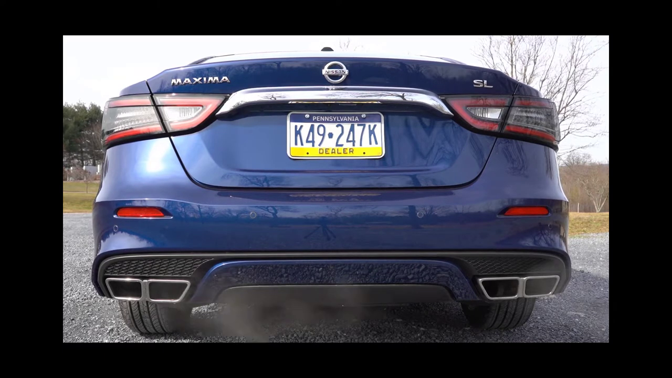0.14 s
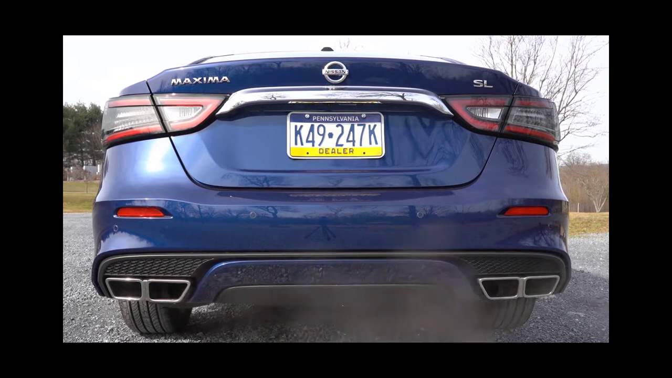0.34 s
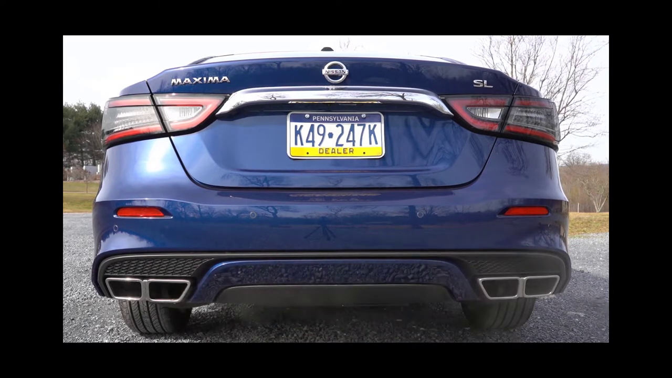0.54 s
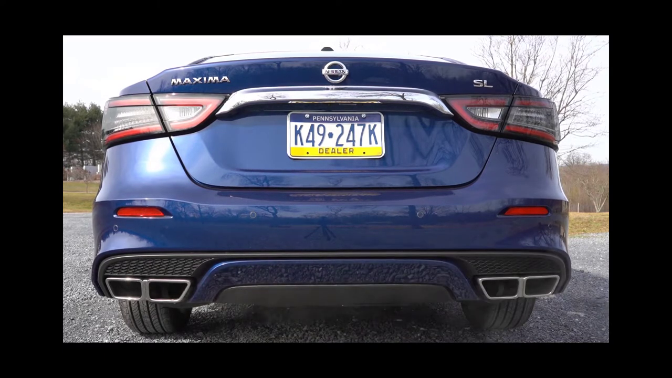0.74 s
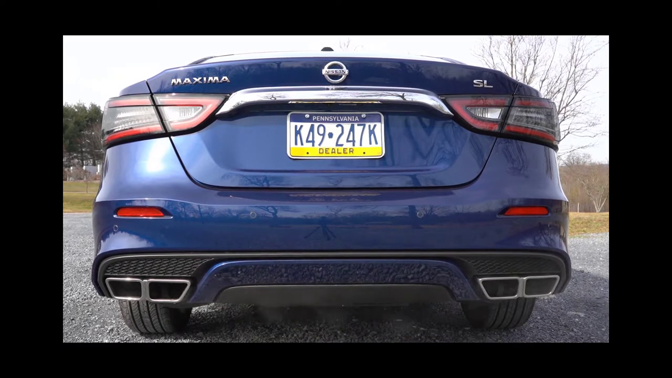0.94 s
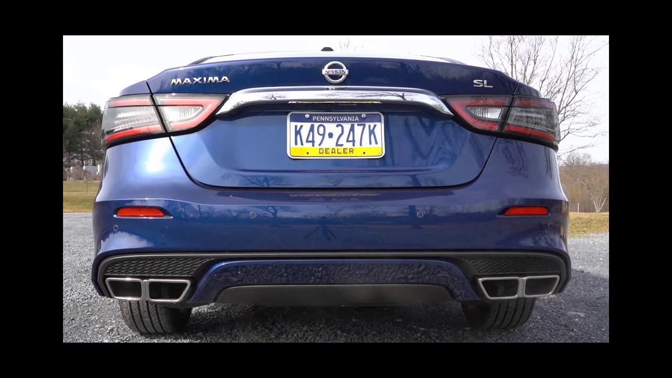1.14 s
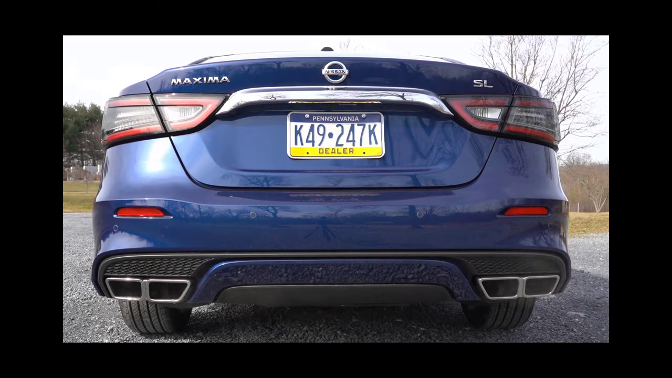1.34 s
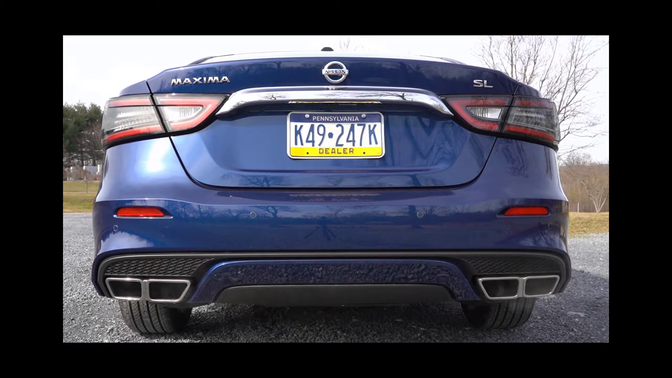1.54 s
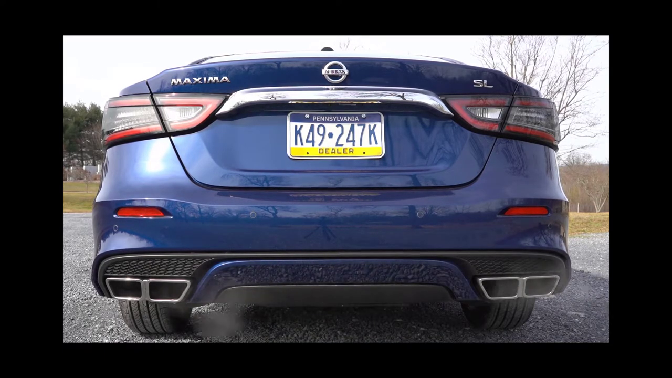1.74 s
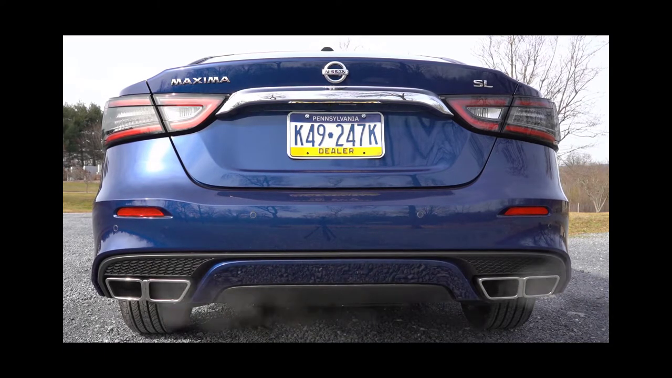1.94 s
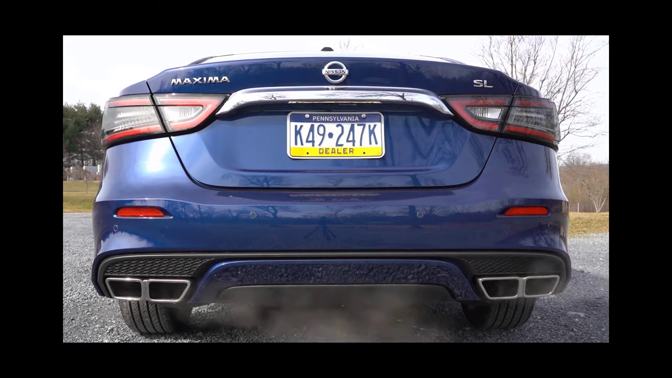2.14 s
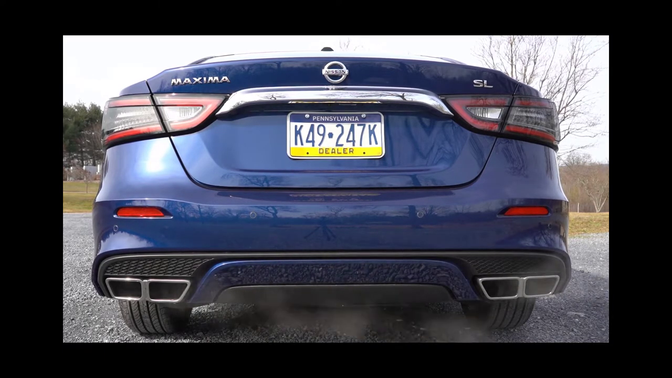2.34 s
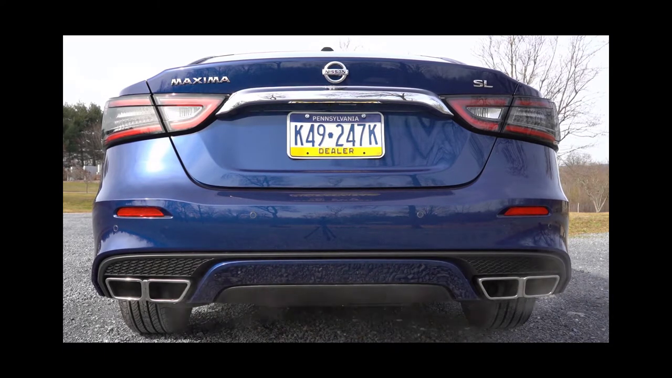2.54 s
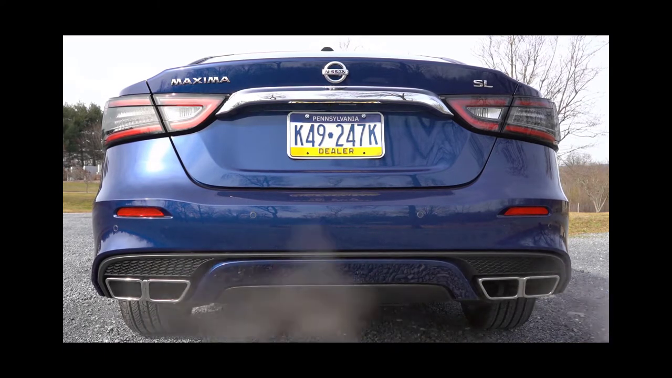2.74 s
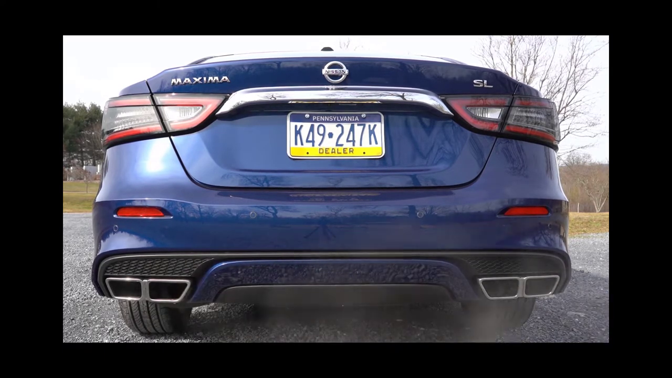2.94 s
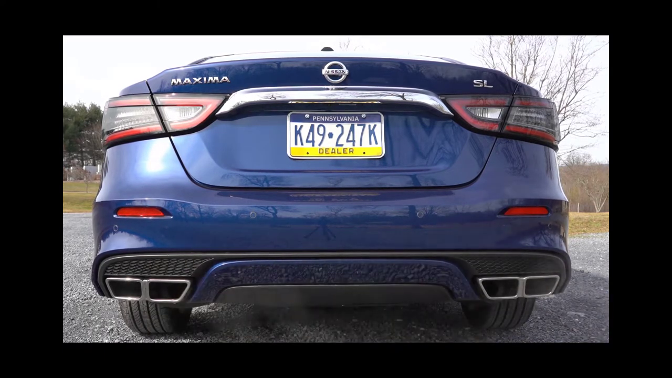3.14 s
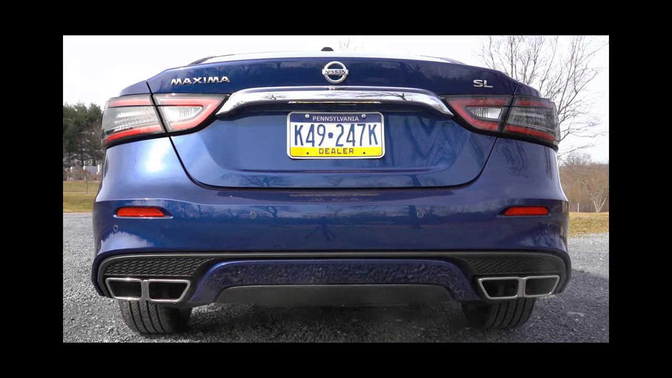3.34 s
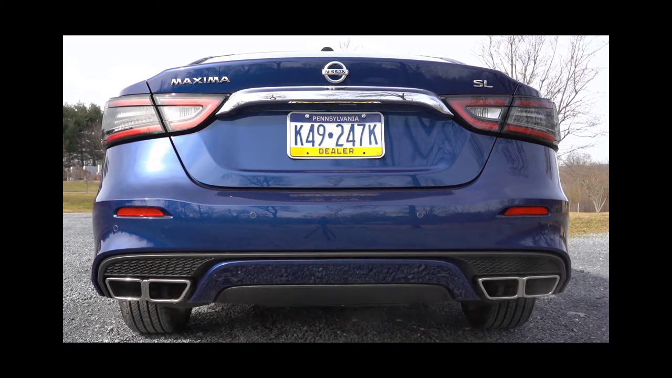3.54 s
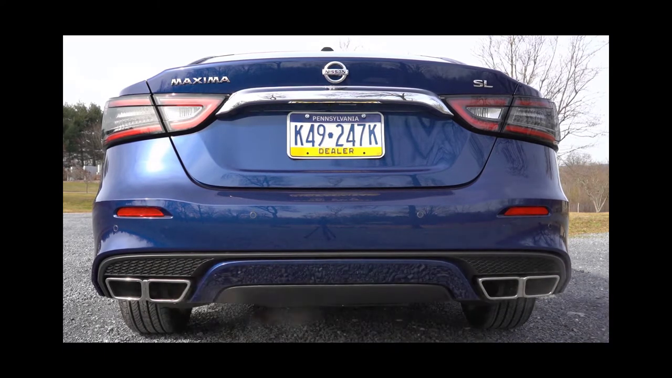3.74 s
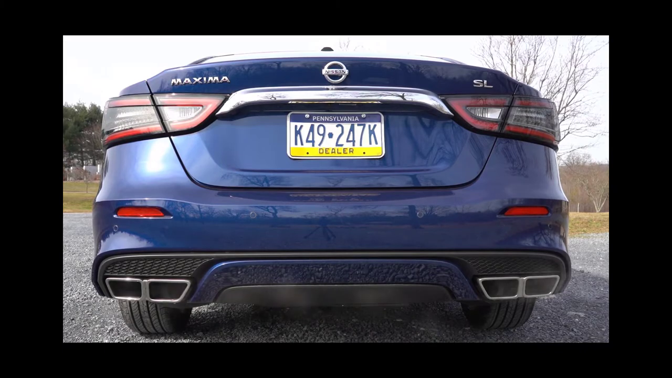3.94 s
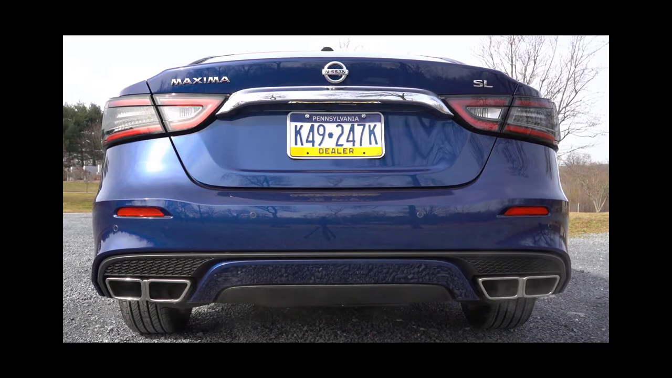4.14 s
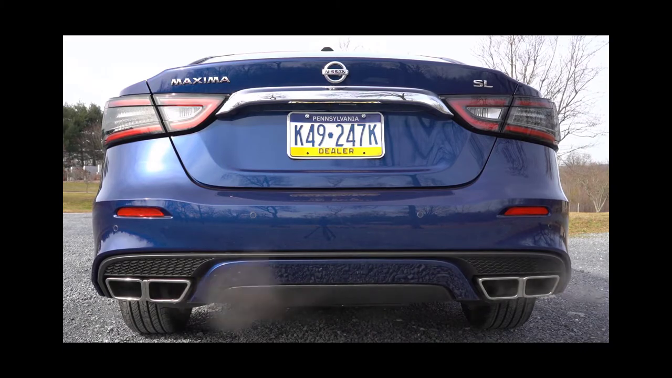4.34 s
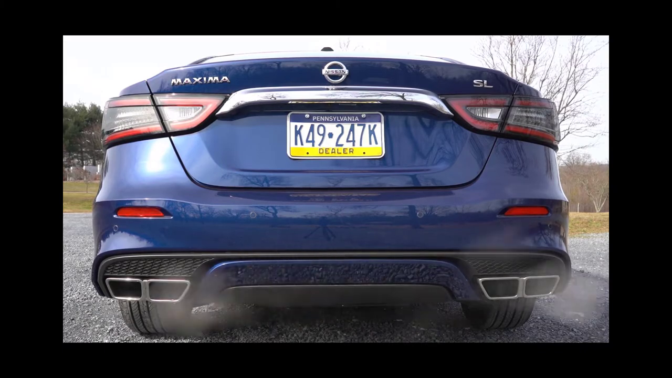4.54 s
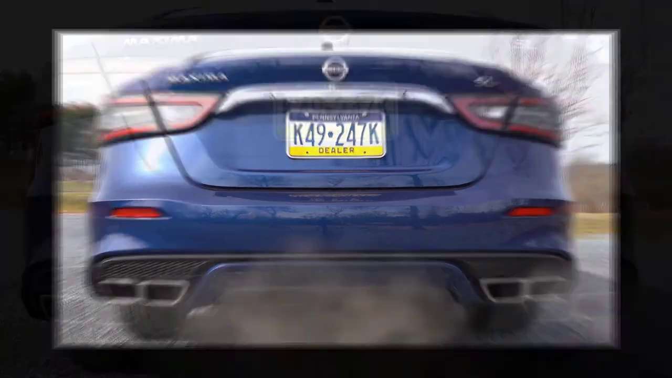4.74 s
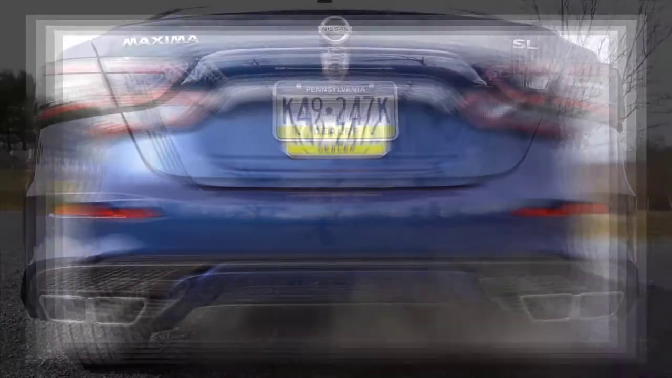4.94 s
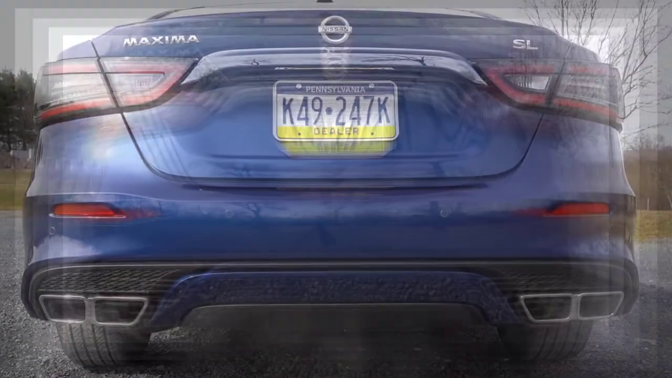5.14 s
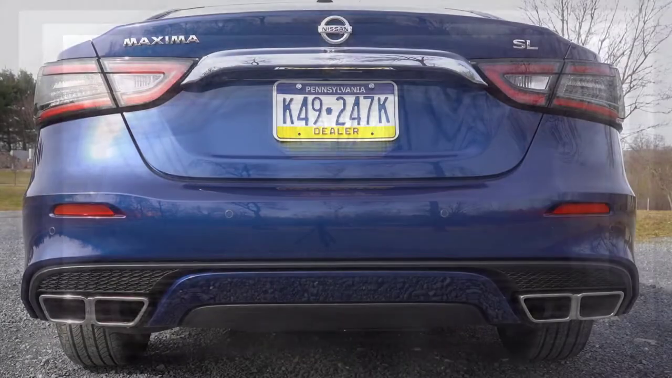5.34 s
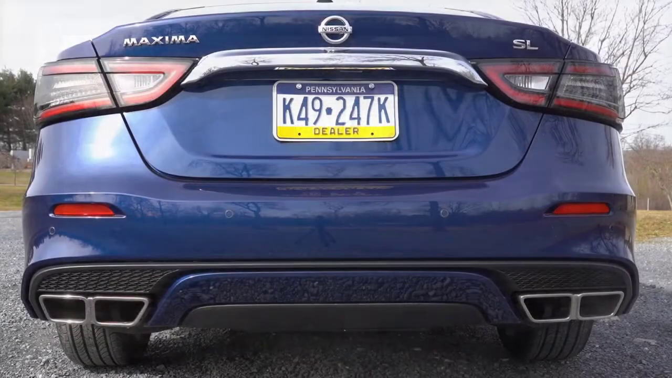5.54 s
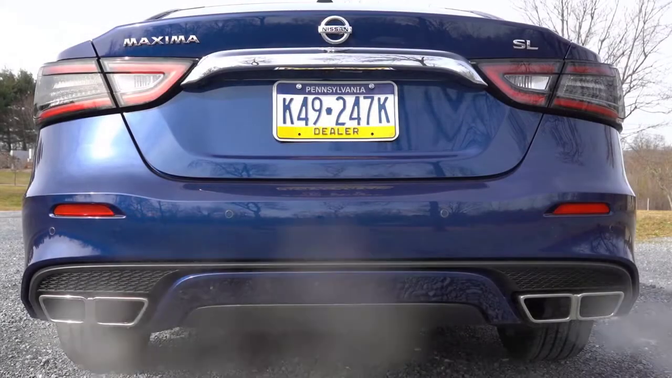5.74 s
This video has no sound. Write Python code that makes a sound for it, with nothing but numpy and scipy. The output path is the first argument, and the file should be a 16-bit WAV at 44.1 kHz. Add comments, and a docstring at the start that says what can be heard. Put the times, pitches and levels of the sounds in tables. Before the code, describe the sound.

A six-cylinder car engine is revved again and again, its exhaust booming, snarling at each peak, then burbling and hissing as the revs sink.

```python
"""A V6 car is revved again and again, heard outdoors from close behind its twin tailpipes.
Six uneven cylinders blow pulses into the exhaust. A double stab of the throttle makes it boom, then
snarl at the top, then burble and hiss as the revs sink. A thin whine comes in near idle, lasts through
a small blip and stops as a big one takes off at 2.6 s. Another blip follows at 4.5 s, then two faint
ticks, the second as the last and highest rev starts to climb."""
import sys
import numpy as np
from scipy import signal
from scipy.fft import rfft, irfft, next_fast_len
from scipy.io import wavfile
from scipy.ndimage import uniform_filter1d

SR = 44100
rng = np.random.default_rng(int(sys.argv[2]) if len(sys.argv) > 2 else 0)


def digitize_waveform(pressure):
    """Quantize a signal to 16-bit integers and store it at the path in sys.argv[1].

    Rows of a 2-D input are taken as channels; values are limited to [-1, 1].
    """
    field = np.atleast_2d(pressure).T
    bounded = np.clip(field, -1, 1)
    quanta = np.round(bounded * 32767).astype(np.int16)
    wavfile.write(sys.argv[1], SR, quanta)


N = 260190
TIME = np.arange(N) / SR

# rough firing, cleanest at the top of each blip: (time [s], raggedness [0-1])
RAGGEDNESS = [(.15, .8), (.45, .22), (.65, .22), (1, .55), (1.6, 1), (2.25, .45), (2.7, .5), (2.9, .15),
              (3.08, .17), (3.3, .8), (3.7, .5), (4.4, 1), (4.85, .25), (5.15, .28), (5.6, .7), (5.85, .22)]
# cylinders in firing order: (pulse strength [dB], lateness [share of the firing interval])
CYLINDERS = [(-4, -.04), (-.4, .01), (.1, -.01), (-3, .29), (2.1, -.06), (1.5, -.18)]
# mix of the exhaust layers, by name: (cruising level [dB], rise with speed [dB/octave],
# lift per unit of throttle [dB], bark [dB], overrun [dB], lull [dB], coast [dB])
LAYER_LEVELS = {"burble": (-27.5, -2.5, 0.5, 3, -3, -3, 1.5), "snarl": (-32, 12.5, 2.7, -1, -4.5, -4, 5),
                "blare": (-35, 17.5, 3.5, 6, 1.7, 0.5, 3.5), "rasp": (-40.5, 11, 4, 9.5, 9, -6, 2),
                "hiss": (-53.2, 9, 3.5, 11, 8.5, -2.5, 0.2), "spray": (-71, 13, -1.5, 3.5, 8, -5.5, -0.5)}
# bright colour of the gas spray and the ticks: (frequency [Hz], relative level [dB])
BRIGHT_SPECTRUM = [(3500, -35.5), (6000, 5.5), (8000, 1), (11000, -9), (15500, -11.5)]


def amp(db):
    """Decibels to gain."""
    return 10 ** (np.asarray(db) / 20)


def unit(x):
    """Scales to rms 1."""
    return x / np.sqrt(np.mean(x ** 2) + 1e-20)


def curves(rows):
    """Joins rows of (time [s], values...) into one automation curve per value."""
    times, *columns = np.transpose(rows)
    return [np.interp(TIME, times, column) for column in columns]


def plateaus(rows, attack_s, release_s):
    """Sums envelopes that rise, hold and fall away."""
    return sum(size * np.clip((TIME - on) / attack_s, 0, 1) * np.clip(1 - (TIME - off) / release_s, 0, 1)
               for on, off, size in rows)


def swells(rows):
    """Sums bell-shaped swells."""
    return sum(size * np.exp(-((TIME - peak) / width) ** 2) for peak, width, size in rows)


def smooth(x, seconds):
    """Triangular running mean."""
    size = max(int(seconds * SR), 1)
    return uniform_filter1d(uniform_filter1d(x, size), size)


def at_level(x, db, seconds):
    """Rides a sound along a level curve while keeping its fast flutter."""
    return amp(db) * x / np.sqrt(abs(smooth(x ** 2, seconds)) + 1e-14)


def wander(rate_hz, size=4096):
    """Random drift of rms 1, rolled off above rate_hz."""
    hz = np.fft.rfftfreq(size, TIME[-1] / size)
    drift = irfft(rfft(rng.standard_normal(size)) / (1 + (hz / rate_hz) ** 4), size)
    return np.interp(TIME, np.linspace(0, TIME[-1], size), unit(drift))


def colour(x, points):
    """Equalises by a curve drawn on a log-frequency axis, then scales to rms 1."""
    size = next_fast_len(N + 4096)
    hz, db = np.transpose(points)
    gain = amp(np.interp(np.log(np.fft.rfftfreq(size, 1 / SR) + 1), np.log(hz), db))
    return unit(irfft(rfft(x, size) * gain, size)[:N])


def ring(x, modes, low_hz, high_hz, sway_db=3.0, sway_hz=7):
    """Rings a set of resonances within one passband; each swells and fades with the unsteady flow."""
    out = np.zeros(N)
    for k, (hz, width, db) in enumerate(modes):
        mode = signal.lfilter(*signal.iirpeak(hz, hz / width, SR), x)
        out += (-1) ** k * amp(db + sway_db * wander(sway_hz)) * mode  # pipe modes alternate in sign
    passband = signal.butter(3, [low_hz, high_hz], "band", fs=SR, output="sos")
    return unit(signal.sosfilt(passband, out))


def engine_state(firing_hz, cruise_hz=130):
    """The controls that ride the mix: octaves above cruising, throttle, bark, overrun, lull, coast."""
    # stabs of the throttle: (opens [s], closes [s], opening [about 1 = full])
    stabs = [(0.03, 0.099, 1), (0.131, .315, 0.99), (1.906, 2.016, 0.9), (2.579, 2.848, 0.96),
             (4.534, 4.76, 1.1), (5.615, 5.732, 0.84)]
    # the exhaust barks as a stab takes hold: (peak [s], half-width [s], strength [factor])
    barks = [(.18, .085, 1.12), (.345, 0.065, 0.64), (2.062, 0.05, 0.58), (2.757, 0.067, 0.8),
             (4.617, 0.047, 0.95), (5.81, 0.093, 1.13)]
    # the engine brakes itself and gas rushes out: (begins [s], eases [s], strength [factor])
    overruns = [(.99, 1.34, 1.045), (3.452, 3.854, 0.84), (5.387, 5.53, 1.05)]
    # the engine floats, neither pulling nor braking: (middle [s], half-width [s], depth [factor])
    lulls = [(.12, 0.012, 0.44), (.65, 0.18, 0.48), (1.79, 0.088, 1.08), (3.01, 0.059, 0.31),
             (4.39, .11, 1.91), (4.95, 0.17, 0.8), (5.595, 0.021, 0.64)]
    octaves = np.log2(firing_hz / cruise_hz)
    throttle = plateaus(stabs, attack_s=0.025, release_s=0.14)
    overrun = plateaus(overruns, attack_s=0.16, release_s=0.28)
    rise_s, fade_s = 0.12, 0.25  # the revs coast for a moment after each stab
    coasts = [plateaus([(closes, closes + rise_s, size)], rise_s, fade_s) for _, closes, size in stabs]
    coast = np.max(coasts, axis=0) * np.clip(1 - throttle, 0, 1)
    return np.array([octaves, throttle, swells(barks), overrun, swells(lulls), coast])


def level(rule, state):
    """A layer's level in dB: its cruising level plus its response to each thing the engine does."""
    return rule[0] + np.array(rule[1:]) @ state


def crank(firing_hz, wobble=0.0067):
    """Engine cycles turned so far; ragged firing shakes the speed."""
    ragged, = curves(RAGGEDNESS)
    shaken_hz = firing_hz * (1 + wobble * ragged * wander(30))
    return np.cumsum(shaken_hz) / SR / len(CYLINDERS)


def pulses(cycles, size=4096, harmonics=170):
    """Six sharp pulses a cycle, of unequal strength and spacing, without the strong low tones."""
    order = np.arange(harmonics)
    lines = sum(amp(db) * np.exp(-2j * np.pi * order * (k + late) / len(CYLINDERS))
                for k, (db, late) in enumerate(CYLINDERS))
    lines[:2] = 0
    lines[[3, 6, 9, 12]] = 0  # boom() plays these
    return unit(np.interp(cycles % 1, np.arange(size) / size, irfft(lines, size)))


def puffs(cycles, steady, decay, uneven_db):
    """Turbulence flares over a steady flow at each firing; decay is in firing intervals."""
    firings = cycles * len(CYLINDERS)
    which = firings.astype(int)
    scatter_db = uneven_db * rng.standard_normal(2048)[which % 2048]
    strength_db = np.array(CYLINDERS)[which % len(CYLINDERS), 0] + scatter_db
    flare = amp(strength_db) * np.exp(-(firings % 1) / decay)
    return unit((steady + flare) * rng.standard_normal(N))


def exhaust_flow(cycles, beat):
    """Adds fresh puffs to the pulse beat: clean firing gives sharp harmonics, ragged firing a fuzz."""
    ragged, = curves(RAGGEDNESS)
    return beat + 2.6 * ragged * puffs(cycles, steady=0.4, decay=0.55, uneven_db=3.5)


def ambience(level_db=-42):
    """The steady wash of engine bay and open air."""
    # a dark bed of noise: (frequency [Hz], relative level [dB])
    wash_spectrum = [(20, -27.5), (50, -9.5), (160, -4), (1000, -5), (4600, -32), (6500, -41.5),
                     (11000, -40), (15500, -54)]
    return amp(level_db) * colour(rng.standard_normal(N), wash_spectrum)


def boom(cycles, firing_hz, state, flutter=0.1):
    """Low harmonics of one cylinder bank's firing rate boom as they sweep the silencer's resonances."""
    # tones at 3, 6, 9 and 12 beats per cycle, ahead of the silencer: columns as in LAYER_LEVELS
    tone_levels = [(-17, 8, -14.5, 0, 2, -11, -5), (-16, 11, 10, -0.24, 3.2, -30, 2.5),
                   (-19, 1, -.5, -1, -9.5, -14.5, -8), (-27.5, -5, 16, -1.2, 1.5, 3, 6)]
    # the silencer's response: (frequency [Hz], gain [dB])
    silencer = [(32, -36), (42, -4.5), (52, -8), (76, -15.5), (95, -8.5), (130, -3.5), (170, -11.5),
                (220, -23), (285, -6), (335, -13.5), (420, -9)]
    hz, gain_db = np.transpose(silencer)
    bank_turns = cycles * len(CYLINDERS) / 2
    out = np.zeros(N)
    for k, rule in enumerate(tone_levels, 1):
        db = level(rule, state) + np.interp(np.log(k * firing_hz / 2), np.log(hz), gain_db)
        tone = np.sqrt(2) * np.cos(2 * np.pi * k * bank_turns)
        out += amp(db) * tone * (1 + flutter * wander(10))
    return out


def burble(flow, state):
    """The muffler rings low, and thumps when the load jumps or the engine catches near idle."""
    # muffler resonances: (frequency [Hz], width [Hz], relative level [dB])
    muffler_modes = [(46.4, 63, -1), (89, 57, 1.5), (126.2, 30.4, 6.5), (206, 16, -7.5),
                     (270.6, 21.2, -1.5), (308, 12, -9)]
    # thumps: (peak [s], half-width [s], lift [dB])
    thumps = [(.07, 0.035, 1), (1.59, 0.045, 4.5), (1.97, 0.041, 8.5), (3.36, 0.12, 7.5),
              (4.17, 0.041, 1.5), (4.57, 0.029, 6), (5.635, 0.032, 10)]
    db = level(LAYER_LEVELS["burble"], state) + swells(thumps)
    return at_level(ring(flow, muffler_modes, 28, 334), db, seconds=0.036)


def drone(flow, trim_db=-0.5):
    """The long pipe hums on two narrow resonances."""
    # long pipe resonances: (frequency [Hz], width [Hz], relative level [dB])
    long_pipe_modes = [(382.4, 7.4, -2), (417.9, 7.2, -13.5)]
    # the drone's fader, ahead of the trim: (time [s], level [dB])
    fader = [(0.0, -55), (0.16, -25.5), (0.26, -36), (0.34, -20), (0.67, -30), (0.71, -27), (0.95, -26),
             (0.98, -38), (1.08, -21.5), (1.76, -41.5), (2.1, -27), (2.76, -30), (2.82, -24), (3.04, -27.5),
             (3.33, -22), (3.42, -31.5), (3.53, -19.5), (4.32, -45), (4.85, -23.5), (5.11, -41.5),
             (5.8, -28.5), (5.9, -41)]
    return at_level(ring(flow, long_pipe_modes, 350, 421), curves(fader)[0] + trim_db, seconds=0.22)


def snarl(flow, state):
    """The mid pipe rings, growing with the revs."""
    # mid pipe resonances: (frequency [Hz], width [Hz], relative level [dB])
    mid_pipe_modes = [(498.7, 47, 1.3), (556.6, 15.6, 8.2), (633.2, 13.3, 9), (708.3, 10, 5)]
    db = level(LAYER_LEVELS["snarl"], state)
    return at_level(ring(flow, mid_pipe_modes, 414, 754), db, seconds=0.086)


def blare(flow, state):
    """The tailpipe rings out at high revs and on each bark."""
    # tailpipe resonances: (frequency [Hz], width [Hz], relative level [dB])
    tailpipe_modes = [(759.8, 15.7, 6.7), (851.6, 19, 3.5), (931.6, 18.6, 6.8), (991, 33, 6.45)]
    db = level(LAYER_LEVELS["blare"], state)
    return at_level(ring(flow, tailpipe_modes, 700, 1164), db, seconds=0.29)


def rasp(flow, cycles, state, steepening=0.27, loud_db=-25):
    """Loud pulses steepen in the pipe and ring the tips; as the revs sink, rushing gas takes over."""
    # metallic resonances of the tips: (frequency [Hz], width [Hz], relative level [dB])
    tip_modes = [(1219.4, 22, 14.5), (1441, 8.3, -9.5), (1425, 7.8, -2.5), (1652, 6, -2)]
    # resonances of the rushing gas: (frequency [Hz], width [Hz], relative level [dB])
    gas_modes = [(1495.6, 80, 4.5), (2135, 97, -6), (2337, 55, -6), (2714, 42, -5.5)]
    blare_db, throttle = level(LAYER_LEVELS["blare"], state), state[1]
    metal_db = blare_db - 14 + steepening * (blare_db - loud_db)
    metal = amp(metal_db) * ring(flow, tip_modes, 1354, 1800)
    turbulence = puffs(cycles, steady=2.9, decay=0.39, uneven_db=2)
    rush_db = level(LAYER_LEVELS["hiss"], state) + 8.5 - 4 * throttle
    rush = amp(rush_db) * ring(turbulence, gas_modes, 880, 3100)
    return at_level(metal + rush, level(LAYER_LEVELS["rasp"], state), seconds=0.059)


def hiss(cycles, state, trim_db=1):
    """The gas jet hisses and rings across the outlets."""
    # colour of the jet: (frequency [Hz], relative level [dB])
    jet_spectrum = [(1500, -28.5), (2900, -7.5), (4400, -9), (4900, -10.5), (5400, -19), (6200, -25.5),
                    (6950, -26.5), (7500, -33), (15500, -43)]
    # outlet resonances: (frequency [Hz], width [Hz], relative level [dB])
    outlet_modes = [(4280, 140, 1), (4320, 77, 4.7), (4730, 21, 0.5)]
    turbulence = puffs(cycles, steady=1.4, decay=1, uneven_db=3)
    jet = colour(turbulence, jet_spectrum)
    outlets = amp(-8) * ring(turbulence, outlet_modes, 3300, 5200, sway_db=-0.5)
    return amp(level(LAYER_LEVELS["hiss"], state) + trim_db) * unit(jet + outlets)


def spray(cycles, state):
    """A hard flow at high revs adds a fine, high spray."""
    turbulence = puffs(cycles, steady=0.8, decay=0.5, uneven_db=2)
    return amp(level(LAYER_LEVELS["spray"], state)) * colour(turbulence, BRIGHT_SPECTRUM)


def whine(pitch_hz=9152, level_db=-79, start_s=1.48, end_s=2.65):
    """A thin, high tone with a slight quiver in its pitch."""
    hz = pitch_hz + 18 * wander(60)
    tone = np.sqrt(2) * np.sin(2 * np.pi * np.cumsum(hz) / SR)
    gate = smooth(1.0 * ((TIME > start_s) & (TIME < end_s)), seconds=0.02)
    return amp(level_db) * gate * tone


def ticks(decay_s=0.0012):
    """Tiny bursts of bright noise, heard as sharp clicks."""
    # clicks: (time [s], level [dB])
    clicks = [(5.1824, -50), (5.6452, -47)]
    envelope = sum(amp(db) * (TIME >= s) * np.exp(-abs(TIME - s) / decay_s) for s, db in clicks)
    return envelope * colour(rng.standard_normal(N), BRIGHT_SPECTRUM)


def scene():
    """One crankshaft drives every exhaust layer; ambience, whine and ticks join them in mono."""
    # engine speed, six firings to a cycle: (time [s], firing rate [Hz])
    revs = [(.06, 61.46), (.15, 90.8), (.2, 115.9), (.3, 151.9), (.4, 163.4), (.5, 171.9), (.7, 169.5),
            (.9, 157.5), (1.1, 143.5), (1.4, 108.3), (1.7, 80.92), (1.9, 79.1), (2.1, 115.5), (2.3, 121.7),
            (2.62, 118.5), (2.7, 144.1), (2.76, 178.3), (2.9, 197.3), (3.1, 194.4), (3.4, 165.8),
            (3.5, 158.4), (3.8, 127.3), (4, 102.9), (4.3, 76.5), (4.4, 82.8), (4.52, 83.3), (4.6, 101.5),
            (4.65, 122.2), (4.8, 147), (4.9, 152.8), (5.2, 149.7), (5.4, 140.1), (5.5, 128.1),
            (5.66, 126.7), (5.75, 169), (5.85, 212.6)]
    firing_hz, = curves(revs)
    state = engine_state(firing_hz)
    cycles = crank(firing_hz)
    exhaust = boom(cycles, firing_hz, state)
    ragged, = curves(RAGGEDNESS)
    beat = pulses(cycles) * (1 + 0.54 * ragged * wander(66))  # ragged firing shakes the pulse strength
    exhaust += burble(exhaust_flow(cycles, beat), state)
    exhaust += drone(exhaust_flow(cycles, beat))
    exhaust += snarl(exhaust_flow(cycles, beat), state)
    exhaust += blare(exhaust_flow(cycles, beat), state)
    exhaust += rasp(exhaust_flow(cycles, beat), cycles, state)
    exhaust += hiss(cycles, state) + spray(cycles, state)
    return (ambience() + exhaust + whine() + ticks())[None]


def record(dry, cutoff_hz=15650):
    """A steep low-pass takes off the very top."""
    lowpass = signal.firwin(511, cutoff_hz, window=("kaiser", 9), fs=SR)
    return signal.oaconvolve(dry, lowpass[None], "same")


dry = scene()
out = record(dry)
digitize_waveform(out)
```